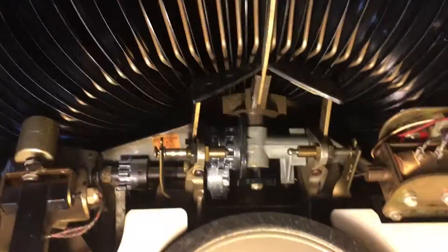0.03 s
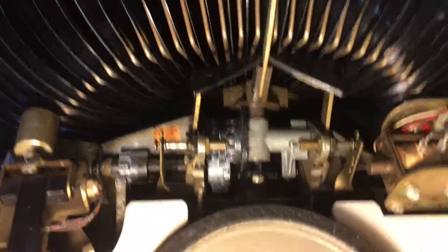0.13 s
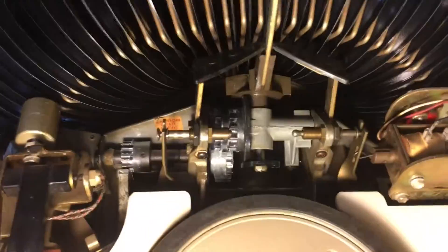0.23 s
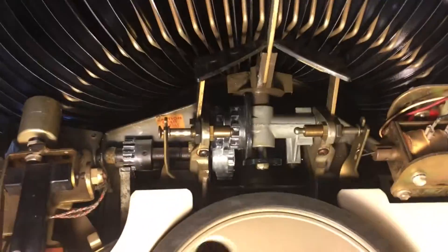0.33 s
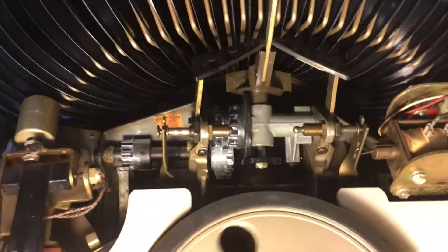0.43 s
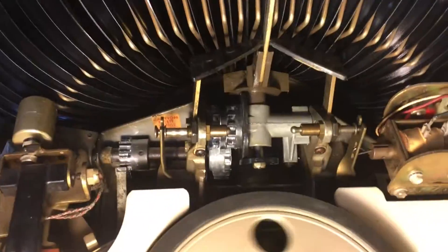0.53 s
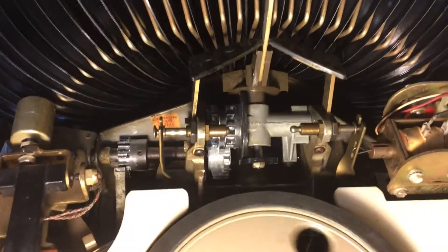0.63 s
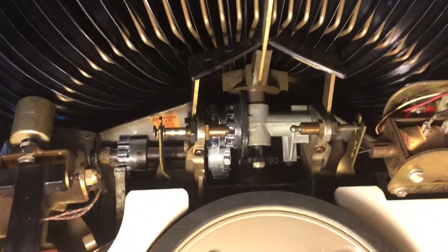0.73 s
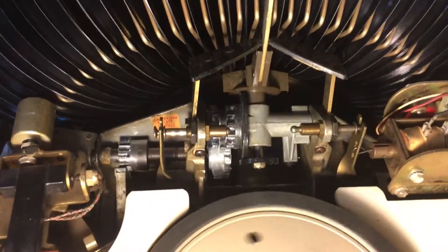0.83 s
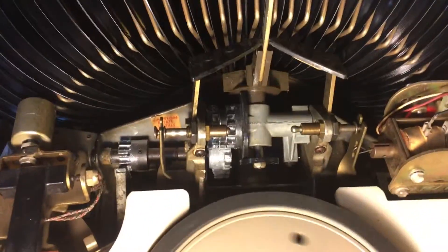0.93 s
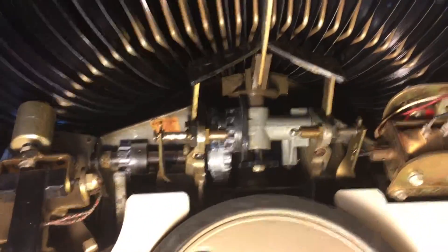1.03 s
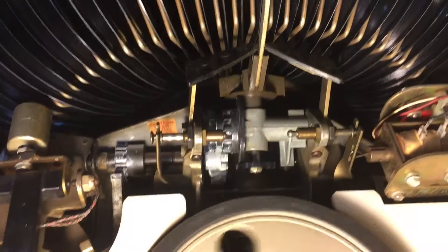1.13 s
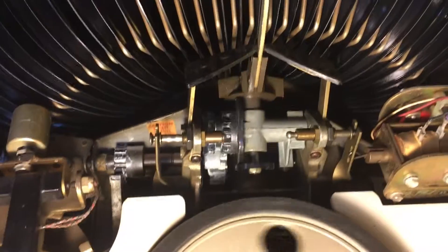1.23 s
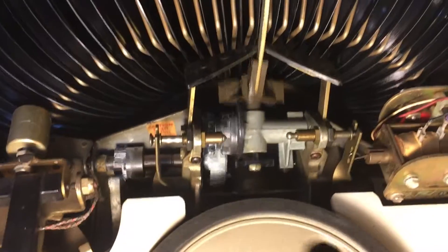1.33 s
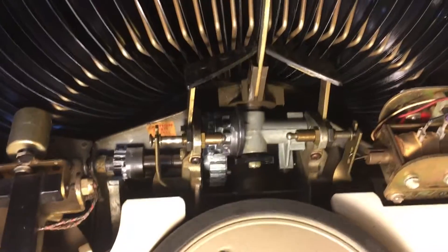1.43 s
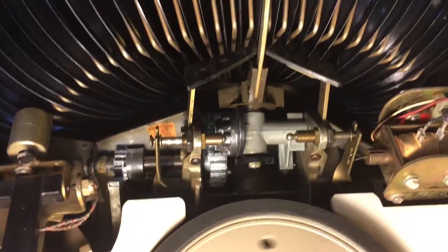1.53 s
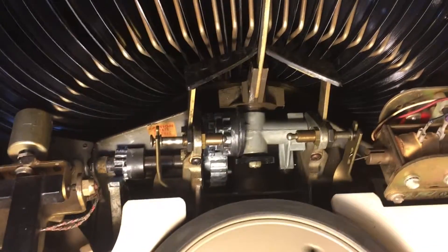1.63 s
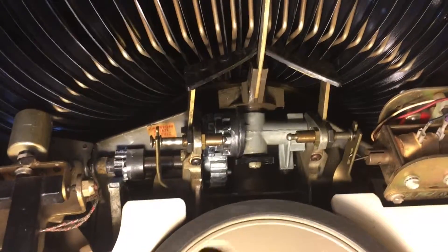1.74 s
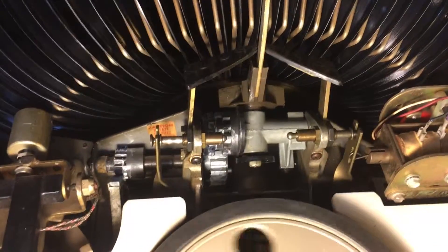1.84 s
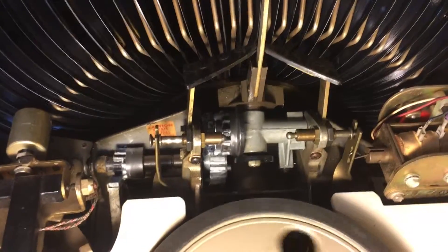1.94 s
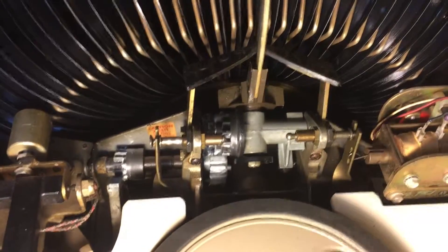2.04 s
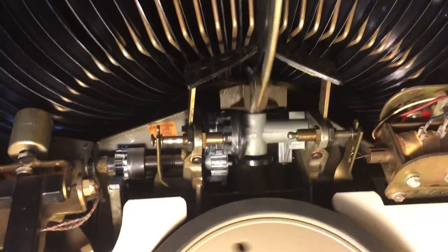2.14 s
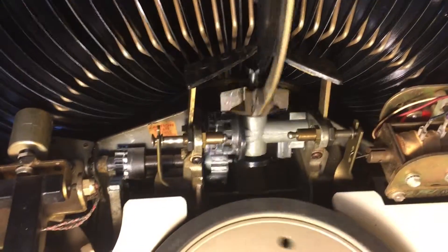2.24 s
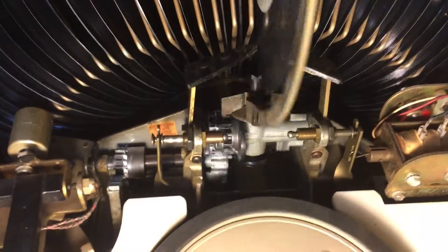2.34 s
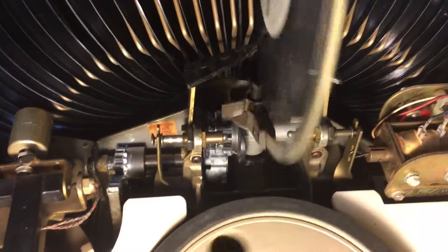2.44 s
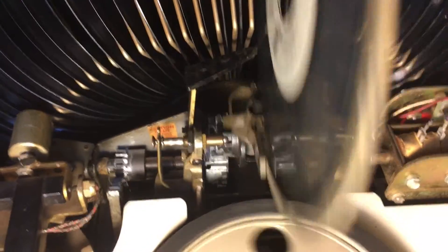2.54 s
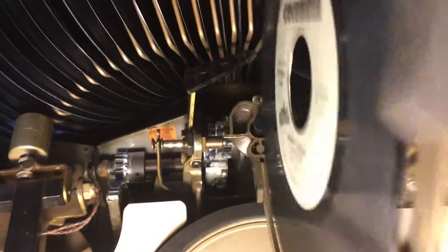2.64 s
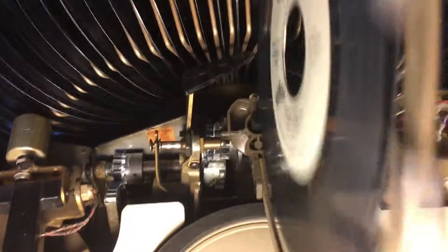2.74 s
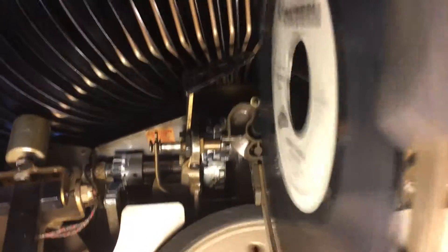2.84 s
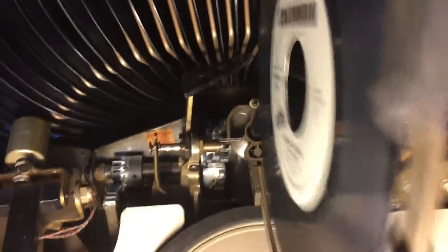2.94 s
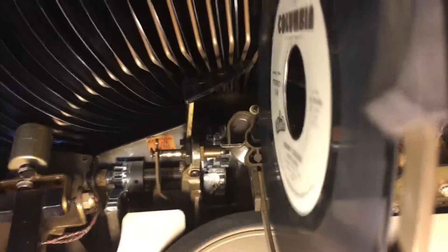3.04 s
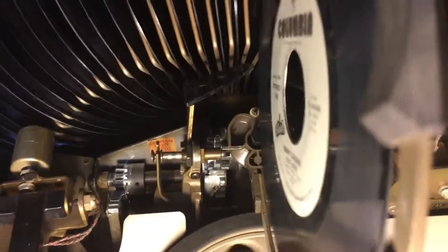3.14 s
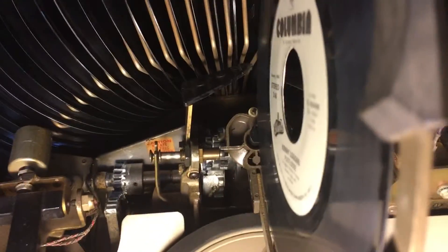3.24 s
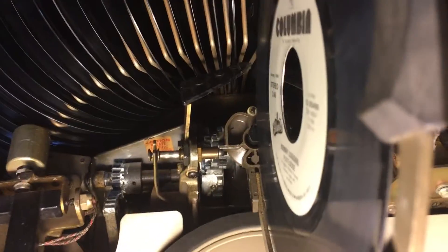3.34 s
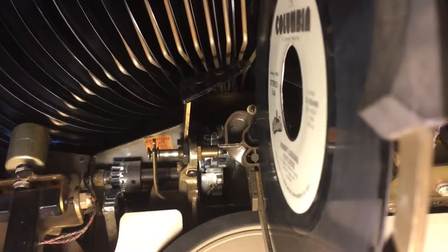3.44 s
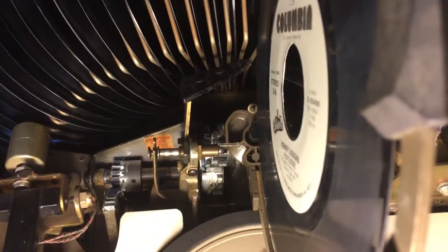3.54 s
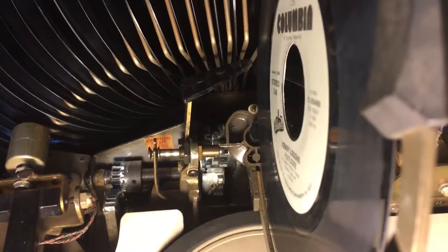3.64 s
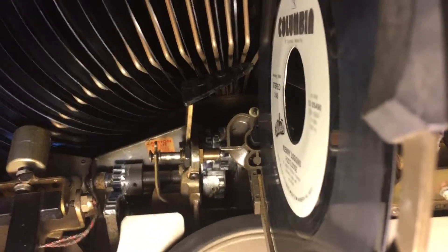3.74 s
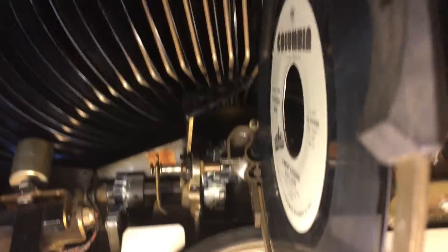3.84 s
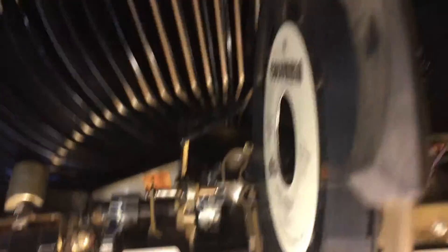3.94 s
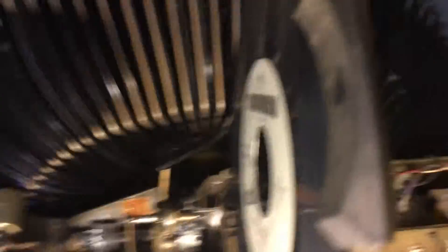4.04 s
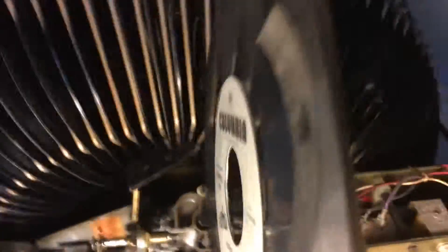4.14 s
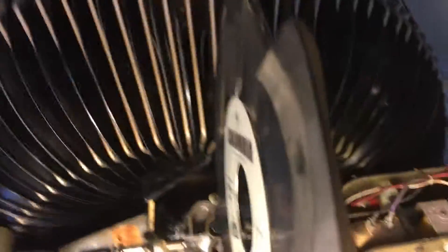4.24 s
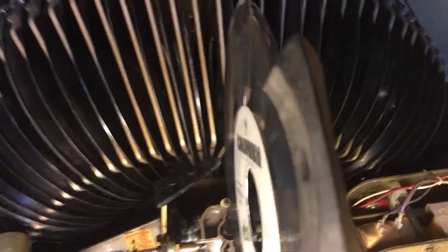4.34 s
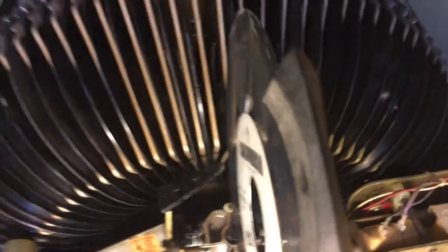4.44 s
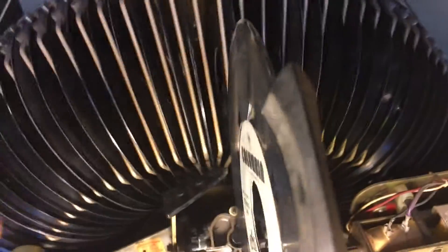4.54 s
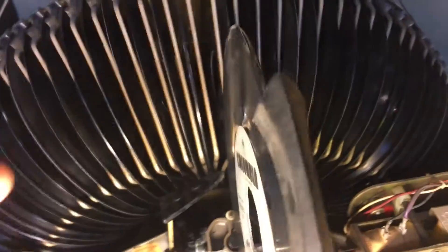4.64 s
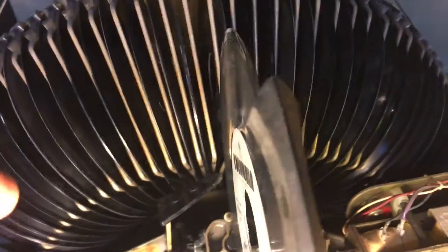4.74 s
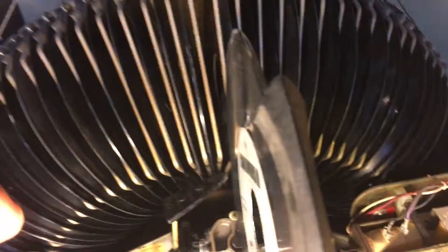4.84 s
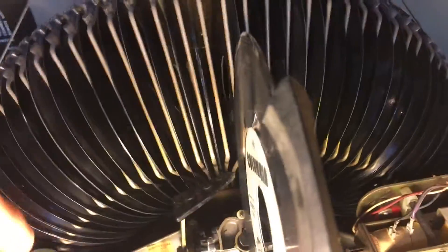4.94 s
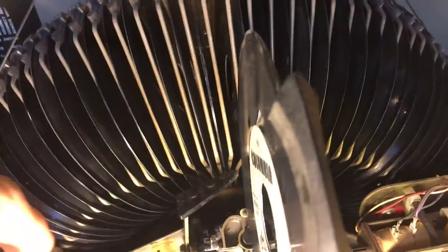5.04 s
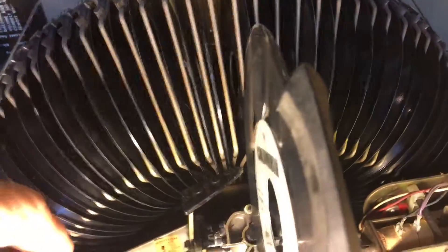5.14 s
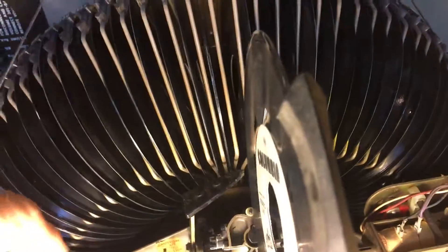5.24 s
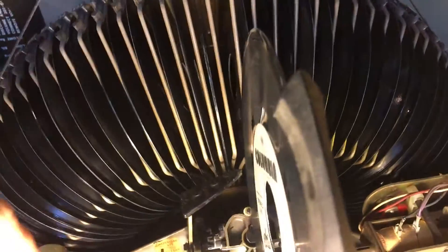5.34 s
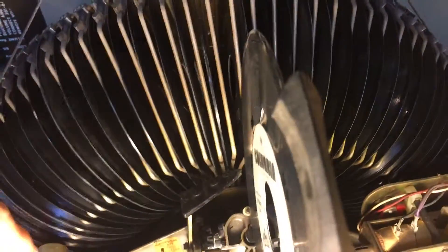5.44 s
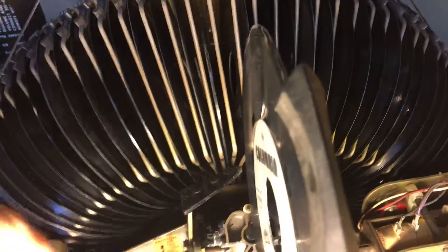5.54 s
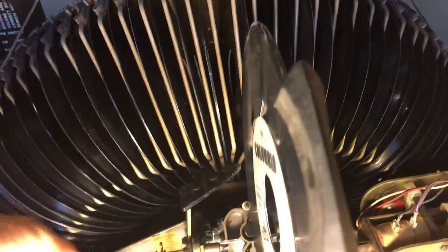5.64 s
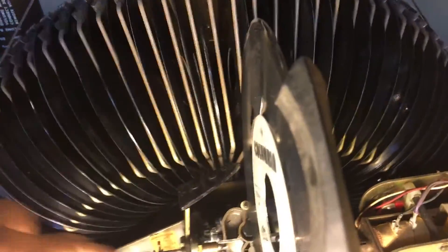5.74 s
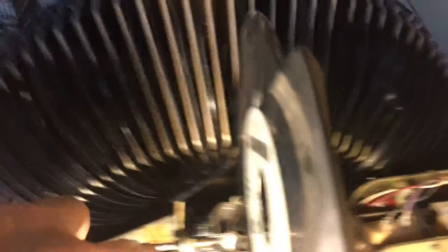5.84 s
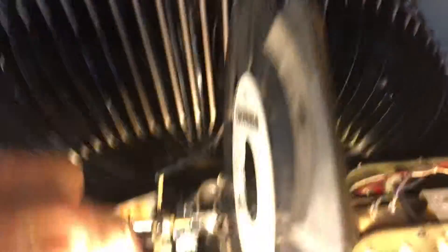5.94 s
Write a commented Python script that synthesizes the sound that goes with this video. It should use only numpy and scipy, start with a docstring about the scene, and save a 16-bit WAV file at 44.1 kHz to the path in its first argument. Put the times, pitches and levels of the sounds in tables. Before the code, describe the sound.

Gritty mechanical whirring and hissing with a quick clatter of latches halts, leaving electrical buzz, then a double bump on the microphone.

```python
"""A jukebox changer's motor and gears whir, heard close up: shaft-timed noise rings the chassis, sliding steel hisses.
Contacts of cam, latch and arm ring the linkage as a record is lifted into place.
The gears stop after three seconds; the mains buzz of a coil and its loose sheet metal, a sum of harmonics, remains.
Then the handheld camera shifts: two dry knocks of damped modes right at its microphone, and handling rumble."""
import sys
import numpy as np
from scipy import signal
from scipy.fft import rfft, irfft, next_fast_len
from scipy.io import wavfile
from scipy.ndimage import map_coordinates

SR = 44100
rng = np.random.default_rng(int(sys.argv[2]) if len(sys.argv) > 2 else 0)


def put_to_file(sound):
    """Save the sound as 16-bit audio at rate SR, in the file named by the first command-line argument."""
    columns = np.atleast_2d(sound).T  # one column per channel
    safe = np.clip(columns, -1, 1)
    whole_steps = np.round(safe * 32767)
    wavfile.write(sys.argv[1], SR, whole_steps.astype(np.int16))


N = 263718  # samples
MAINS_HZ, TOP_HZ = 59.99, 15850


def amp(db):
    """Decibels to gain."""
    return 10 ** (np.asarray(db) / 20)


def unit(x):
    """Scale to rms 1."""
    return x / np.sqrt(np.mean(x ** 2) + 1e-20)


def along(points, hz):
    """Read (Hz, value) points on a log frequency axis."""
    point_hz, value = np.transpose(points)
    return np.interp(np.log(hz + 1), np.log(point_hz + 1), value)


def curve(rows):
    """One value per sample through (s, value) points."""
    point_s, value = np.transpose(rows)
    return np.interp(np.arange(N) / SR, point_s, value)


def wobble(knots_per_s):
    """Smooth random curve."""
    knots = rng.standard_normal(int(N * knots_per_s / SR) + 4)
    return map_coordinates(knots, [np.arange(N) * knots_per_s / SR])


def swell(centre_s, half_s):
    """Gaussian bump of height 1, down to 1/e at half_s from its centre."""
    return np.exp(-((np.arange(N) / SR - centre_s) / half_s) ** 2)


def until(end_s, fade_s):
    """1 at first, fading linearly to 0 at end_s."""
    return np.clip((end_s - np.arange(N) / SR) / fade_s, 0, 1)


def filtered(x, response):
    """x times a complex response of frequency."""
    size = next_fast_len(N + SR // 2)
    return irfft(rfft(x, size) * response(np.fft.rfftfreq(size, 1 / SR)), size)[:N]


def coloured(x, spectrum):
    """x shaped by a (Hz, dB) spectrum, at rms 1."""
    return unit(filtered(x, lambda hz: amp(along(spectrum, hz))))


def noise(spectrum):
    """Steady shaped noise of rms 1."""
    return coloured(rng.standard_normal(N), spectrum)


def rung(x, modes):
    """x through parallel resonances of alternating sign, at rms 1."""
    def response(hz):
        total = 0
        for k, (mode_hz, width_hz, level_db) in enumerate(modes):
            damping = 1j * hz * width_hz
            total = total + (-1) ** k * amp(level_db) * damping / (mode_hz ** 2 - hz ** 2 + damping)
        return total
    return unit(filtered(x, response))


def add(track, start_s, sound):
    """Mix a sound into a track at start_s."""
    part = track[round(start_s * SR):][:len(sound)]
    part += sound[:len(part)]


# strongest buzz lines: (mains_multiple, gears_running_db, at_rest_db, camera_shifted_db)
BUZZ_LINES = [(2, -57, -56, -59), (3, -71, -70, -69), (6, -62, -61, -62), (10, -55, -60, -62),
              (11, -69, -65, -67), (13, -67, -57, -56), (14, -62, -61, -62), (15, -67, -57, -56),
              (16, -63, -64, -57), (17, -63, -52, -57), (18, -54, -54, -55), (19, -62, -72, -58),
              (20, -65, -60, -57), (21, -60, -48, -46), (23, -72, -52, -54), (25, -52, -53, -53),
              (27, -50, -50, -47), (29, -49, -50, -50), (30, -70, -58, -61), (32, -75, -59, -59),
              (33, -59, -58, -62), (35, -57, -60, -62), (38, -74, -62, -65), (46, -88, -77, -63),
              (58, -62, -63, -67), (60, -68, -60, -67), (62, -65, -59, -60), (97, -61, -64, -71),
              (100, -81, -63, -60)]
# mean level of each other line: (line_hz, gears_running_db, at_rest_db, camera_shifted_db)
BUZZ_FIZZ = [(400, -72, -74, -77), (1500, -68, -73, -68), (2200, -71, -68, -72), (3050, -81, -75, -79),
             (3600, -79, -71, -69), (4300, -71, -69, -70), (4950, -73, -73, -77), (5500, -71, -66, -70),
             (6300, -73, -68, -73), (7700, -85, -80, -84), (9000, -82, -79, -79), (10500, -91, -91, -91),
             (14000, -97, -92, -97), (15500, -105, -99, -106)]


def buzz_cycle(state):
    """One mains cycle of the buzz: loose metal slaps on each of the two magnetic pulls."""
    k = np.arange(1, int(TOP_HZ / MAINS_HZ))
    hz = k * MAINS_HZ
    level_db = along(np.array(BUZZ_FIZZ)[:, [0, state]], hz) + 6 * rng.uniform(-1, 1, len(k))
    lines = np.array(BUZZ_LINES)
    level_db[np.rint(lines[:, 0]).astype(int) - 1] = lines[:, state]
    # odd lines a quarter turn from even ones: two equally strong slaps a cycle
    slaps = np.pi / 2 * (k % 2)
    # sheet metal delays each register differently; reflections blur the treble most
    delay_s = .004 * np.sin(2 * np.pi * hz / 5000) - .003
    blur_rad = along([(1000, .7), (2000, .75), (3500, 1.4)], hz)
    phase = slaps - 2 * np.pi * MAINS_HZ * np.cumsum(delay_s) + blur_rad * rng.standard_normal(len(k))
    size = 2 ** 14
    return irfft(np.r_[0, amp(level_db) * np.exp(1j * phase)], size) * size / np.sqrt(2)


def buzz(gain_db=0.1, rough_db=0.2, surge_db=1.2, surge_fade_s=0.047):
    """The coil buzzes throughout; its colour changes when the gears stop and when the camera shifts."""
    turns = MAINS_HZ * (np.arange(N) / SR + .000004 * wobble(6))  # slight timing jitter
    tones = []
    for state in (1, 2, 3):
        cycle = buzz_cycle(state)
        tones.append(np.interp(turns % 1, np.linspace(0, 1, len(cycle), endpoint=False), cycle))
    running, resting, shifted = tones
    # equal-power crossfades
    stop = curve([(3.02, 0), (3.15, 1)]) * np.pi / 2
    shift = curve([(4.08, 0.011), (4.2, 1)]) * np.pi / 2
    still = running * np.cos(stop) + resting * np.sin(stop)
    tone = still * np.cos(shift) + shifted * np.sin(shift)
    # the hand sways, so a reflection from the cabinet slides against the direct treble
    treble = filtered(tone, lambda hz: np.clip((hz - 1800) / 2000, 0, 1))
    path_s = .0019 + .00006 * wobble(2)
    reflection = .35 * map_coordinates(treble, [np.arange(N) - SR * path_s])
    # the coil pulls harder for a moment
    surge = until(4.4, surge_fade_s) - until(4.3, surge_fade_s)
    return (tone + reflection) * amp(gain_db + surge_db * surge + rough_db * wobble(150))


# the cams load or ease the train: (centre_s, half_s, grind_change_db, hiss_change_db)
LOADS = [(.45, 0.15, .5, 1), (1.213, 0.064, -.5, 1), (1.458, 0.011, 2, 2), (2.145, 0.032, -3, -1.5),
         (2.337, 0.052, -0.5, 2.5), (2.717, 0.04, 0.5, 0.5), (2.832, 0.038, -1, -0.5),
         (2.98, 0.095, 1.5, -2.5)]


def gear_levels(grind_db=-39.5, hiss_db=-43.5, wander_db=0.2, wander_per_s=6.97):
    """Levels of grinding and hiss in dB: steady, but for uneven wear and the load of the cams."""
    for centre_s, half_s, grind_change_db, hiss_change_db in LOADS:
        load = swell(centre_s, half_s)
        grind_db = grind_db + grind_change_db * load
        hiss_db = hiss_db + hiss_change_db * load
    return grind_db + wander_db * wobble(wander_per_s), hiss_db + wander_db * wobble(wander_per_s)


# chassis resonances that the gears shake: (mode_hz, width_hz, level_db)
CHASSIS_MODES = [(217.3, 22.5, -0.5), (396, 23, -5.5), (477.6, 13, -4), (598, 26, 1), (1076, 13, 1),
                 (1233, 41, 7), (1258, 108, 2), (1530, 135, -1.5), (1582, 45, 3.5), (1700, 71, -3),
                 (2033, 110, -10.5)]
# spectrum of grinding teeth: (freq_hz, relative_db)
GRIND_SPECTRUM = [(60, -5.5), (130, 0.5), (280, -16), (450, -8), (750, -0.5), (950, 2.5), (1400, 0),
                  (1750, 2), (2000, -2), (2400, -5), (2900, -14), (4000, -25)]
# spectrum of sliding metal, also of tooth ticks: (freq_hz, relative_db)
HISS_SPECTRUM = [(2000, -48), (3200, -8), (3550, -6), (4000, -1), (4450, 4), (5500, -3.5), (6400, 1),
                 (7700, -6.5), (8400, -8), (9200, -7), (10400, -11.5), (12000, -11), (14000, -17.5),
                 (15800, -28)]
# thin steel parts that the sliding excites: (mode_hz, width_hz, level_db)
STEEL_MODES = [(3490, 18, -2), (3783, 16, 0.5), (4407, 40, 0.5), (4737, 13, 1), (4720, 65, 1),
               (5343, 61, 0.5), (5810, 17, 0), (6280, 11, 3.5), (7270, 42, -5), (8070, 48, -5),
               (8360, 49, -3), (9030, 110, -5.5), (9760, 71, -8.5)]


def gears(shaft_hz=26.3, throb_db=-0.5, grain_db=3, scrape_db=2.5, flutter_db=1.9, steel_db=-4, chatter_db=0.5):
    """Teeth grind in time with the motor shaft and shake the chassis; sliding metal hisses in short spurts."""
    stop_s, grind_coast_s, hiss_coast_s = 3.15, 0.074, .12  # the hiss starts to die first
    grind_db, hiss_db = gear_levels()
    shaft = 2 * np.pi * np.cumsum(shaft_hz * (1 + .015 * wobble(4))) / SR
    throb = throb_db * (np.sin(shaft) + np.sin(2 * shaft))

    def teeth():
        return rng.standard_normal(N) * amp(throb + grain_db * wobble(500))

    def sliding():
        return rng.standard_normal(N) * amp(scrape_db * wobble(700))

    grind = amp(1.5) * rung(teeth(), CHASSIS_MODES) + amp(-3) * coloured(teeth(), GRIND_SPECTRUM)
    grind = unit(grind * amp(chatter_db * wobble(130)))  # backlash: uneven chatter
    hiss = amp(-3) * coloured(sliding(), HISS_SPECTRUM) + amp(steel_db) * rung(sliding(), STEEL_MODES)
    # contact pressure changes: the top of the hiss spurts more than its middle
    top = filtered(hiss, lambda hz: np.clip((hz - 6000) / 2000, 0, 1))
    hiss = unit(hiss - top + top * amp(flutter_db * wobble(90)))
    grinding = until(stop_s, grind_coast_s) * amp(grind_db) * grind
    hissing = until(stop_s, hiss_coast_s) * amp(hiss_db) * hiss
    return grinding + hissing


# brief whines of a shaft or panel: (start_s, end_s, pitch_hz, level_db)
WHINES = [(-.05, .1, 1348, -45), (2.2, 2.84, 485, -48.5), (4.68, 4.92, 1336, -49)]
# short bright rasps of the sliding parts: (centre_s, level_db)
RASPS = [(.21, -44), (.575, -43), (.985, -44), (1.165, -42), (1.193, -41), (1.255, -40), (2.03, -43),
         (2.32, -44), (2.75, -42)]


def friction(rasp_half_s=0.0073, waver_hz=3):
    """Sliding parts rasp in noise bursts; a shaft or panel sings as a wavering sine."""
    t = np.arange(N) / SR
    rasp_spectrum = [(5000, -14), (7200, -5), (8400, -0.5), (9100, -7), (10200, -23), (15000, -22)]
    rasps = sum(amp(level_db) * swell(centre_s, rasp_half_s) for centre_s, level_db in RASPS)
    out = rasps * noise(rasp_spectrum)
    for start_s, end_s, pitch_hz, level_db in WHINES:
        arch = np.abs(np.sin(np.pi * np.clip((t - start_s) / (end_s - start_s), 0, 1))) ** .5
        phase = 2 * np.pi * np.cumsum(pitch_hz + waver_hz * wobble(20)) / SR
        out += amp(level_db) * arch * np.sin(phase)
    return out


# spectrum of a hand on the case: (freq_hz, relative_db)
RUMBLE_SPECTRUM = [(20, -12), (45, 7), (75, 2.5), (110, 1), (170, -23), (400, -25.5), (900, -63)]
# shifts of the grip: (centre_s, rumble_db)
NUDGES = [(.1, -54), (2.96, -51), (4.1, -45), (4.32, -51.5), (5.08, -49.5), (5.98, -46)]


def handling(rumble_db=-60, sway_db=2.5, sway_per_s=7, nudge_half_s=0.064):
    """Fingers rumble on the case, more as the grip shifts, and rub it around the knocks."""
    rub_db = curve([(4.06, -100), (4.088, -35.5), (4.135, -44), (4.16, -50), (4.19, -100)])
    rub_spectrum = [(50, -3), (150, 1), (500, -2.5), (1800, 7),
                    (3000, -9), (6500, -5), (9000, -8), (15000, -36)]
    rub = amp(rub_db) * noise(rub_spectrum)
    hold = amp(rumble_db + sway_db * wobble(sway_per_s))
    nudges = sum(amp(level_db) * swell(centre_s, nudge_half_s) for centre_s, level_db in NUDGES)
    return rub + (hold + nudges) * noise(RUMBLE_SPECTRUM)


# cam, latch and arm contacts: (start_s, level_db, relative_scrape_db, relative_body_db)
CLUNKS = [(1.419, -19, -11, -27), (1.4235, -24, -22, -30), (1.4494, -17.5, -15, -15),
          (1.4568, -20, -5.5, -17), (1.4621, -14.5, -18, -24.5), (1.4663, -16.5, -17, -17),
          (2.375, -26.5, -16, -22), (2.743, -27.5, -16, 2), (2.759, -30, -19, -1.5), (2.883, -29, -2, 0.5),
          (2.942, -26, -15, -7), (2.966, -20, -18, -27), (3.018, -22, -14, -10)]
# what the linkage rings with: (mode_hz, relative_db, t60_s)
LINKAGE_MODES = [(790, -7.5, 0.017), (1180, -1, 0.035), (1300, -2.5, 0.079), (1605, -2.5, 0.076),
                 (1756, 14.5, 0.012), (1830, 4.5, 0.026), (2060, -8, 0.091)]
# light ticks of the gear teeth: (start_s, level_db)
TICKS = [(.0698, -40), (.3417, -34), (0.572, -38), (1.3903, -36), (1.4457, -35), (1.609, -33),
         (1.9484, -37), (2.208, -35), (2.7388, -37), (2.9902, -39)]


def linkage(rise_s=0.00046, body_rise_s=0.0044, scrape_t60_s=.04, body_t60_s=0.14, tick_t60_s=0.026):
    """Each contact rings the levers, scrapes, and thuds in the chassis; single teeth tick."""
    ring, scrape, body, ticks = np.zeros((4, N))
    t = np.arange(SR // 5) / SR
    for start_s, level_db, scrape_db, body_db in CLUNKS:
        modes = np.zeros(len(t))
        for mode_hz, mode_db, t60_s in LINKAGE_MODES:
            decay = amp(mode_db + rng.normal(0, 1.5) - 60 * t / t60_s)
            modes += decay * np.sin(2 * np.pi * (mode_hz * t + rng.random()))
        soft_meeting = 1 - np.exp(-t / rise_s)
        add(ring, start_s - .002, amp(level_db - 14.5) * modes * soft_meeting)
        add(scrape, start_s - .002, amp(level_db + scrape_db - 7 - 60 * t / scrape_t60_s))
        thud = amp(level_db + body_db - 8 - 60 * t / body_t60_s)
        add(body, start_s, thud * (1 - np.exp(-t / body_rise_s)))
    for start_s, level_db in TICKS:
        add(ticks, start_s, amp(level_db - 60 * t / tick_t60_s))
    scrape *= noise([(1200, -5), (2300, -1), (3000, 3), (4300, 1), (6000, 1),
                     (9000, -9), (11000, -14), (15800, -27)])
    body *= noise([(70, -24), (190, 7.0), (300, -8.5), (600, -4.5), (900, 4.5), (2000, -48)])
    return ring + scrape + body + ticks * noise(HISS_SPECTRUM)


# echo decay: (freq_hz, t60_s)
CABINET_DECAY = [(150, 0.095), (1500, 0.074), (10000, 0.021)]


def cabinet(x):
    """Short echo of the cabinet: convolution with decaying noise, treble dying first."""
    hz, t, z = signal.stft(rng.standard_normal(SR // 2), SR, nperseg=256)
    decay = amp(-60 * t / along(CABINET_DECAY, hz)[:, None])
    tail = signal.istft(z * decay, SR, nperseg=256)[1]
    return signal.fftconvolve(x, tail / np.linalg.norm(tail))[:N]


# knocks on the camera's case: (start_s, clack_db, tick_db, push_db, push_hz, push_t60_s)
KNOCKS = [(4.0915, -14, -12.5, 5, 168, 0.019), (4.1298, -1, -18.5, 0, 125, .014)]
# the case's wall: (mode_hz, relative_db, t60_s)
CASE_CLACK = [(623, -16.5, 0.012), (1484, 1, 0.0036), (3760, -9.5, 0.0029)]
# its hard rim: (mode_hz, relative_db, t60_s)
CASE_TICK = [(6400, 1.5, 0.0031), (8550, -0.5, 0.0029)]
# its hollow, rung by the push: (mode_hz, relative_db, t60_s)
CASE_THUD = [(316, -19.5, 0.018), (560, -24, 0.0098)]


def knocks(crack_db=-22, crack_decay_s=0.00022):
    """The camera's case is knocked twice: a sharp tick, then a heavily damped push as the case gives way."""
    case_rise_s, push_rise_s, thud_rise_s = 0.00012, 0.0082, 0.0011
    push_lag_s, thud_lag_s = 0.00087, 0.00244
    out, t = np.zeros(N), np.arange(SR // 10) / SR

    def ring(mode_hz, level_db, t60_s):
        return amp(level_db - 60 * t / t60_s) * np.sin(2 * np.pi * mode_hz * t)

    def rise(rise_s):
        return 1 - np.exp(-t / rise_s)

    for start_s, clack_db, tick_db, push_db, push_hz, push_t60_s in KNOCKS:
        wall = amp(clack_db) * sum(ring(*mode) for mode in CASE_CLACK)
        rim = amp(tick_db) * sum(ring(*mode) for mode in CASE_TICK)
        crack = amp(clack_db + crack_db) * rng.standard_normal(len(t)) * np.exp(-t / crack_decay_s)
        push = -ring(push_hz, push_db, push_t60_s)
        hollow = amp(push_db) * sum(ring(*mode) for mode in CASE_THUD)
        add(out, start_s, (wall + rim + crack) * rise(case_rise_s))
        add(out, start_s + push_lag_s, push * rise(push_rise_s))
        add(out, start_s + thud_lag_s, hollow * rise(thud_rise_s))
    return out


# spectrum of the room's air: (freq_hz, relative_db)
AIR_SPECTRUM = [(30, 6), (100, 4.5), (250, -7), (550, -6), (900, -2), (1400, 3.5), (1900, 1.5), (2900, -16),
                (3800, -6), (4900, -8.5), (6200, -8.5), (7700, -18), (9200, -7.5), (10500, -19),
                (15500, -20.5)]


def scene(air_db=-54.5):
    """Machine, camera and the room's steady air."""
    levers, bumps = linkage(), knocks()
    echo = cabinet(amp(-8) * levers + amp(-19) * bumps)
    machine = buzz() + gears() + friction() + levers
    camera = bumps + handling()
    return (machine + camera + echo + amp(air_db) * noise(AIR_SPECTRUM))[None]


def record(dry):
    """The camera's microphone sheds the deep bass and keeps nothing above its band limit."""
    lean = signal.sosfilt(signal.butter(2, 60, "high", fs=SR, output="sos"), dry)
    return np.array([filtered(x, lambda hz: hz < TOP_HZ) for x in lean])


dry = scene()
out = record(dry)
put_to_file(out)
```